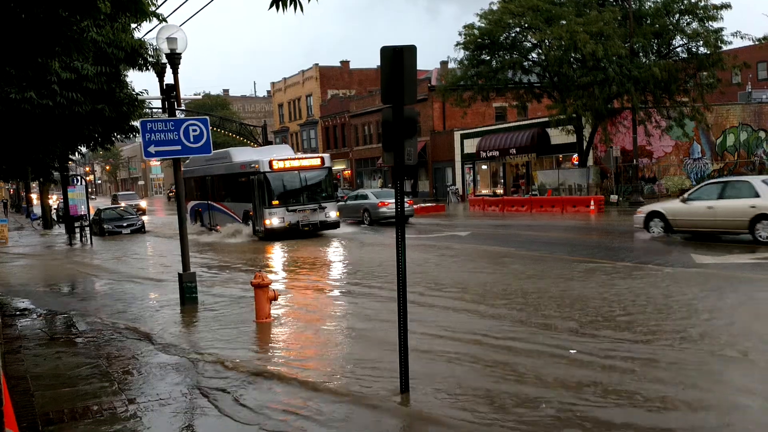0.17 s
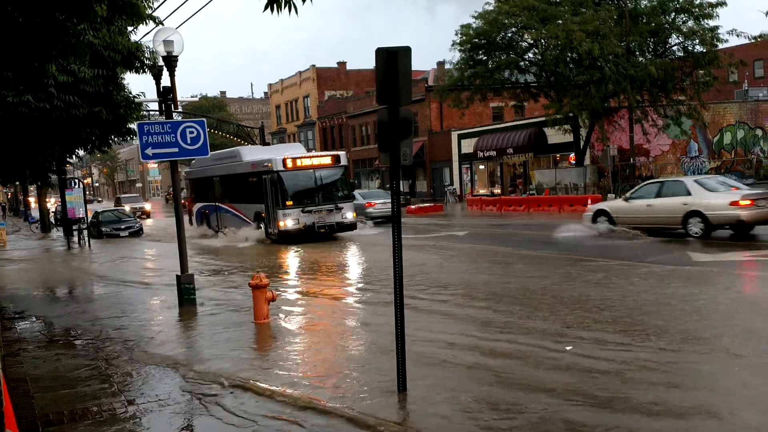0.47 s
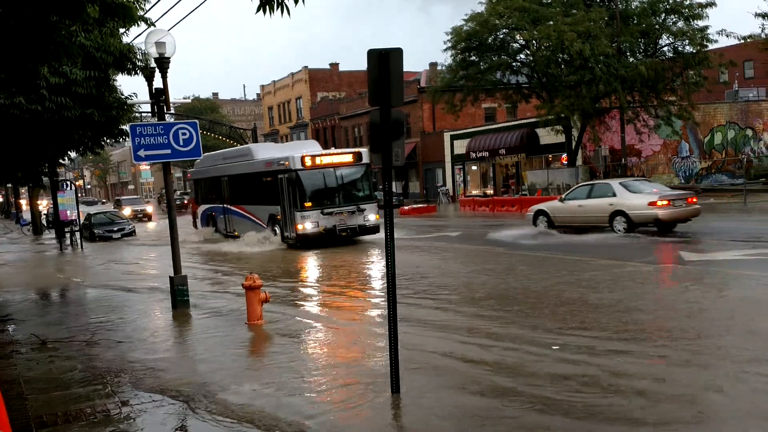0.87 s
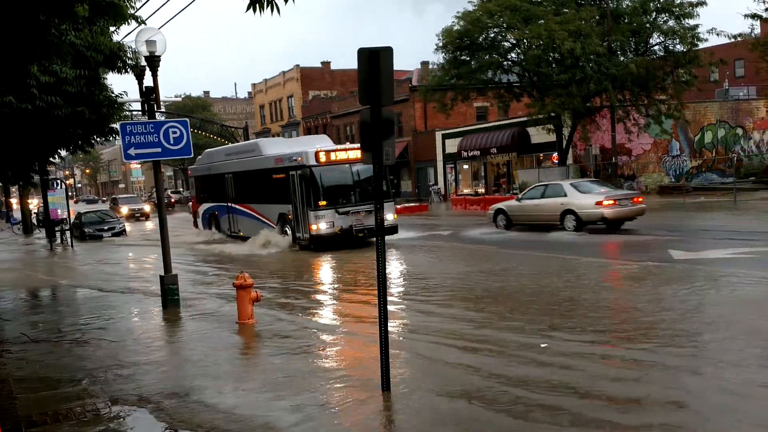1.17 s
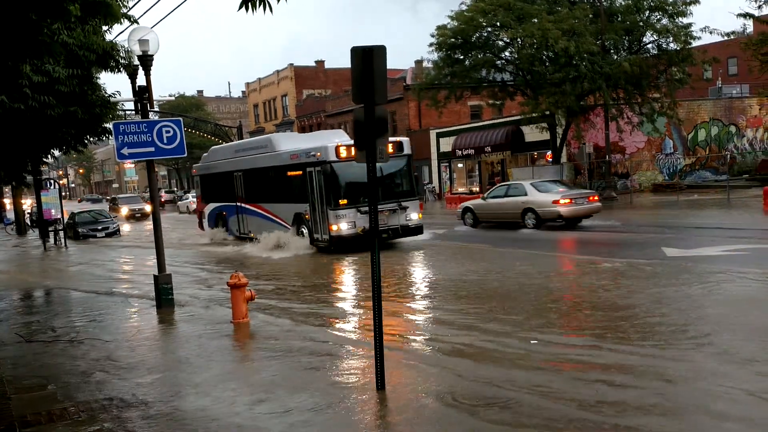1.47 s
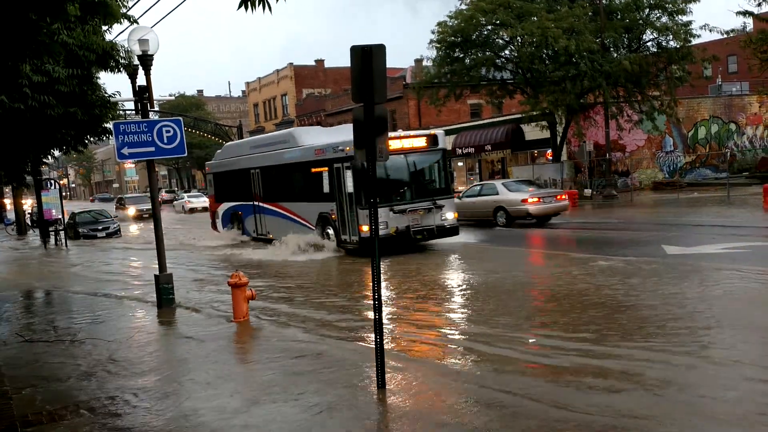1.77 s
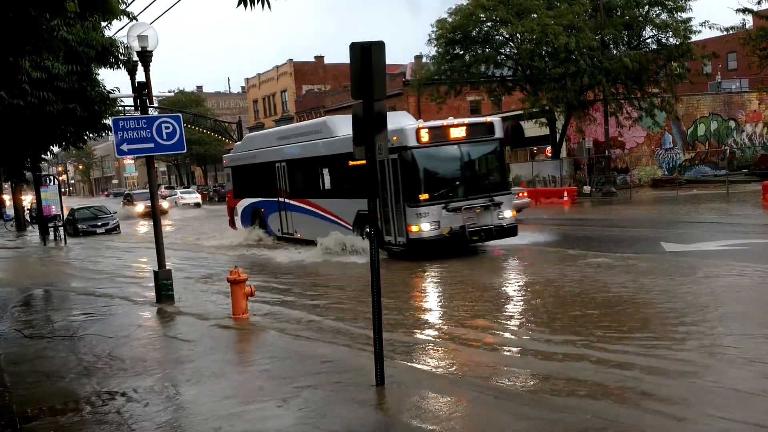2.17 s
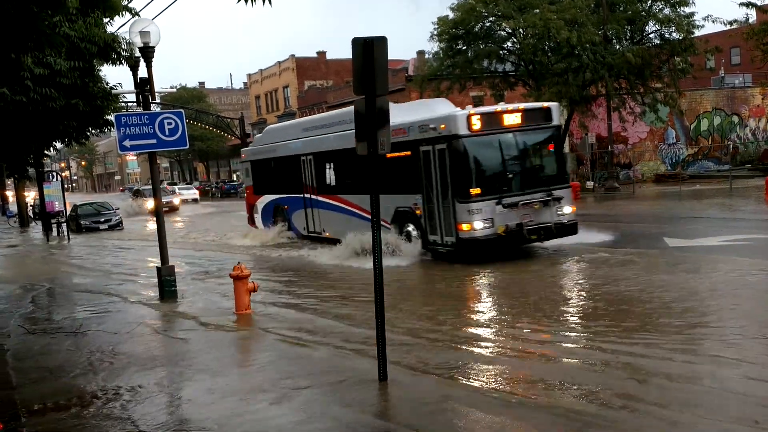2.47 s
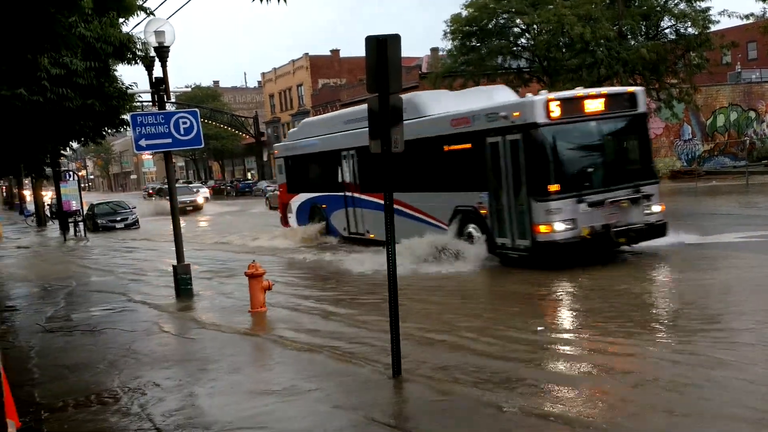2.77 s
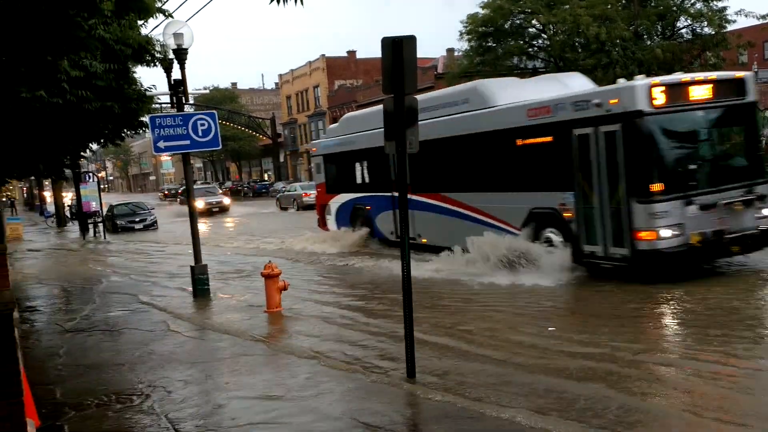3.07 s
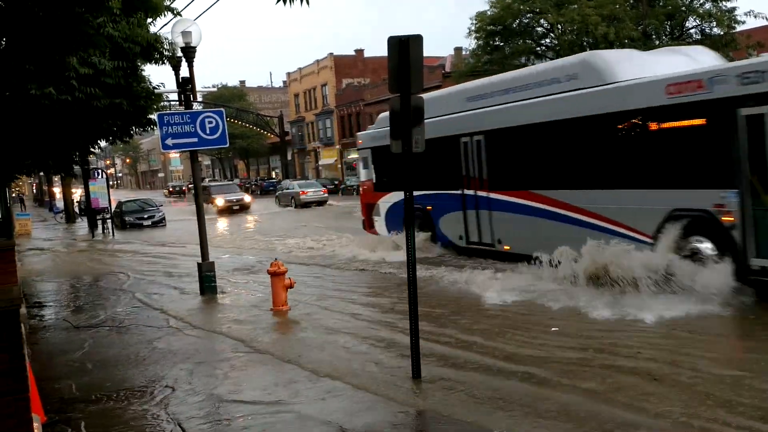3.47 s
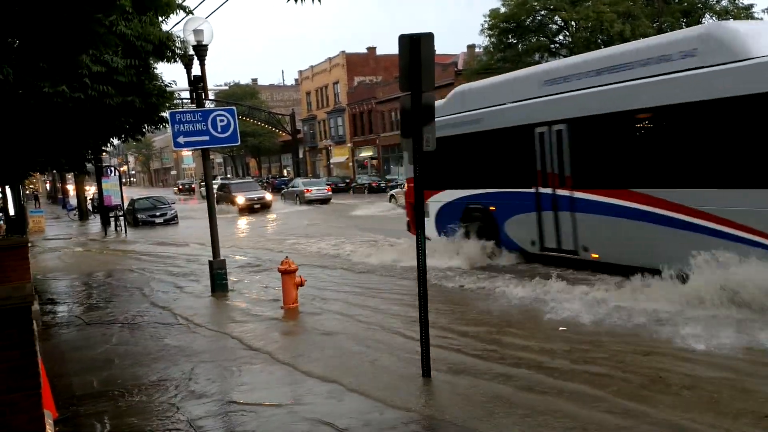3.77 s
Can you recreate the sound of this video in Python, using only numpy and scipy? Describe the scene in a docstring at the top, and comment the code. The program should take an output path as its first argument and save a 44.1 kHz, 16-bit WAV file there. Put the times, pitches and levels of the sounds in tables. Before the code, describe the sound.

A bus ploughs through a flooded street, a dense rush of churned water, rain and engine rumble. As it nears, hissing spray rises on the right, while wind buffets the left side of a hand-held phone microphone.

```python
"""A bus ploughs through a flooded street in the rain, heard by a hand-held phone with two microphone ports.
The sound fades in on a dense rush of engine rumble, bow wave, churned water, rain and spray.
From the outset wind buffets the left port only, with single puffs from 0.2 s to 3.4 s.
As the bus draws near, the rumble grows a little and the spray rises on the right, strongest after 3 s.
Throughout, the phone widens the stereo by subtracting from each side a late copy of the other."""
import sys
import numpy as np
from scipy import signal
from scipy.fft import rfft, irfft
from scipy.io import wavfile
from scipy.ndimage import uniform_filter1d

SR = 44100
rng = np.random.default_rng(int(sys.argv[2]) if len(sys.argv) > 2 else 0)


def master(y):
    """Save y as 16-bit WAV."""
    cut = np.clip(np.atleast_2d(y).T, -1, 1)
    pcm = np.round(cut * 32767)  # scale
    wavfile.write(sys.argv[1], SR, pcm.astype(np.int16))


N = 172431

# Spectrum of the engine rumble: frequency_hz, relative_density_db
ENGINE_SPECTRUM = [(30, -21), (60, -2.5), (100, -4), (140, -2), (185, 2), (260, -5.5), (370, -4.5),
                   (450, -15), (600, -44)]
# Engine rumble as the bus draws near: time_s, level_db
ENGINE_LEVELS = [(.45, -30.5), (.8, -30), (1, -28.5), (1.55, -30.5), (2.1, -28), (2.3, -30), (2.45, -26.5),
                 (2.7, -29), (3.0, -26.5), (3.2, -27), (3.6, -29.5), (3.9, -28.5)]
# Spectrum of the bow wave's hollow drone: frequency_hz, relative_density_db
BOW_WAVE_SPECTRUM = [(560, -3.5), (640, 0.5), (700, 1.5), (745, 1), (790, 0.5), (840, -2.5), (880, 0),
                     (960, -2)]
# Sloshing surges of the bow wave: time_s, level_db
BOW_WAVE_LEVELS = [(.45, -38.5), (.75, -37.5), (.95, -41), (1.07, -34.5), (1.17, -33.5), (1.25, -39),
                   (1.4, -35.5), (1.55, -40), (1.68, -37), (1.9, -37.5), (2.1, -35), (2.27, -39),
                   (2.47, -34), (2.65, -36), (2.77, -31), (2.85, -36.5), (2.92, -34), (3.02, -38.5),
                   (3.12, -32.5), (3.31, -37.5), (3.41, -35.5), (3.55, -35.5), (3.72, -40.5), (3.9, -32)]
# Spectrum of the churned water: frequency_hz, relative_density_db
CHURN_SPECTRUM = [(350, -7), (480, 4), (700, -3.5), (860, -1.5), (1050, 1.5), (1350, 3), (1700, -0.5),
                  (2200, 1)]
# Strength of the churned water and the rain: time_s, churn_db, rain_db
WATER_LEVELS = [(.35, -32.5, -27), (.5, -32, -27), (.6, -34, -28), (.81, -31, -25.5), (.9, -31.5, -27.5),
                (1.02, -31.5, -27), (1.1, -31, -27), (1.18, -31.5, -27.5), (1.3, -31.5, -28.5),
                (1.4, -30, -25.5), (1.43, -32, -29), (1.49, -30.5, -26.5), (1.54, -34, -30),
                (1.76, -31, -27.5), (1.83, -33.5, -30), (1.88, -31.5, -27.5), (2.17, -31, -26.5),
                (2.26, -34.5, -30), (2.43, -31, -26.5), (2.6, -32.5, -28), (2.79, -30, -26.5),
                (2.84, -32, -27), (3.03, -32.5, -29), (3.17, -33, -29), (3.26, -34.5, -29),
                (3.45, -32.5, -29.5), (3.58, -34, -28.5), (3.64, -36, -30), (3.72, -32, -28),
                (3.91, -35.5, -28.5)]
# Spectrum of the rain: frequency_hz, relative_density_db
RAIN_SPECTRUM = [(1500, -63), (2000, -10), (2600, -4), (3500, -10.5), (4200, -9), (5200, -9), (6800, -11),
                 (8500, -15), (10500, -18), (12500, -19.5), (15800, -13)]
# Spectrum of the wheel spray: frequency_hz, relative_density_db
SPRAY_SPECTRUM = [(6800, -12.5), (7700, -10.5), (8500, -1), (9300, -1.5), (10300, -4.5), (11800, -13),
                  (15000, -20)]
# Wheel spray relative to the rain: time_s, excess_db
SPRAY_OVER_RAIN = [(.3, -3.5), (.48, -1), (.65, -1), (.78, -2), (1.07, -1), (1.4, -1.5), (1.78, 0),
                   (2.1, -0.5), (2.45, 0.5), (2.75, 1.5), (3.03, 2.5), (3.17, 5), (3.27, 3.5), (3.57, 5),
                   (3.63, 4), (3.72, 5), (3.9, 4)]
# Spectrum of the wind buffeting: frequency_hz, relative_density_db
WIND_SPECTRUM = [(25, -14), (40, -5), (58, 0), (80, 0), (110, -2), (150, -6), (200, -12), (320, -21),
                 (600, -32)]
# Gusts at the left port: time_s, level_db
GUST_LEVELS = [(.12, -21), (.23, -23), (.35, -27), (.5, -30), (.6, -27), (.68, -30), (.77, -36), (.8, -25),
               (1.1, -26), (1.28, -30), (1.45, -28), (1.7, -27), (1.95, -32), (2.1, -30), (2.2, -40),
               (2.3, -40), (2.42, -25), (2.6, -28), (2.75, -29), (3, -24), (3.2, -26), (3.35, -34),
               (3.55, -33), (3.7, -41), (3.9, -40)]
# Single puffs of wind: peak_s, thump_db, pitch_hz
WIND_PUFFS = [(0.185, -9, 119), (0.204, -10, 130), (0.229, -10, 110), (0.244, -9, 124), (0.301, -11, 96),
              (0.313, -14, 100), (0.353, -17, 114), (0.557, -16, 94), (0.578, -16, 139), (0.604, -16, 89),
              (0.646, -11, 155), (0.797, -11, 150), (0.815, -11, 96), (0.844, -17, 111), (0.871, -13, 94),
              (0.91, -14, 114), (0.93, -17, 102), (1.012, -18, 191), (1.03, -14, 103), (1.08, -14, 144),
              (1.131, -18, 129), (1.153, -16, 114), (1.179, -16, 102), (1.445, -17, 122), (1.496, -21, 128),
              (1.525, -17, 98), (1.615, -17, 134), (1.667, -21, 120), (1.708, -19, 86), (1.74, -20, 83),
              (1.759, -21, 111), (1.924, -19, 106), (2.052, -13, 86), (2.102, -17, 120), (2.383, -17, 117),
              (2.445, -14, 143), (2.532, -10, 122), (2.551, -11, 110), (2.581, -19, 100), (2.611, -16, 101),
              (2.683, -11, 102), (2.785, -11, 126), (2.813, -20, 111), (2.833, -19, 101), (2.859, -15, 114),
              (2.947, -18, 102), (2.98, -12, 115), (3.041, -8, 139), (3.061, -9, 128), (3.1, -14, 91),
              (3.128, -15, 125), (3.154, -14, 117), (3.183, -18, 111), (3.224, -19, 137), (3.386, -11, 135)]
# Response of the left port relative to the right: frequency_hz, gain_db
LEFT_PORT_RESPONSE = [(200, 0), (300, -3), (420, 0), (1500, 0), (2000, -2), (2700, -4), (3800, -1.5),
                      (5200, -2.5), (7000, -.6), (12000, 2), (15800, 4)]
# Coherence between the two ports: frequency_hz, correlation_ratio
PORT_COHERENCE = [(60, 0.97), (200, 0.95), (370, 0.95), (460, 0.49), (600, 0.93), (800, 0.54), (1050, 0),
                  (1500, 0.09)]
# Share of the opposite side that the phone subtracts: frequency_hz, gain_ratio
CROSSFEED_GAINS = [(60, .85), (400, .86), (1000, .9), (2200, .92), (3200, .86), (4300, .8), (6500, .64),
                   (8400, .36), (10700, .1), (13000, .01)]

TIME_S = np.arange(N) / SR
BIN_HZ = np.arange(N // 2 + 1) * SR / N


def undb(db):
    """Amplitude ratio of a level in decibels."""
    return 10 ** (np.asarray(db) / 20)


def over_hz(table):
    """Interpolation of a table at every spectral bin, on a logarithmic frequency axis."""
    hz, values = np.array(table, float).T
    return np.interp(np.log(BIN_HZ + 1), np.log(hz), values)


def over_s(table, column=1):
    """Linear interpolation of one column of a time table at every sample."""
    rows = np.array(table, float)
    return np.interp(TIME_S, rows[:, 0], rows[:, column])


def wander(rate_hz):
    """Slow random modulation: Gaussian steps smoothed by two moving averages."""
    hold = int(SR / rate_hz)
    steps = np.repeat(rng.standard_normal(N // hold + 1), hold)
    return 0.99 * uniform_filter1d(uniform_filter1d(steps, hold), hold)[:N]


def shot_spectrum(clicks_per_s, scatter_db, click_share):
    """Spectrum of shot noise plus hiss: independent signals add in power, here in a set proportion."""
    chance, polarity, size = rng.random((3, N))
    clicks = (chance < clicks_per_s / SR) * np.sign(polarity - .5)
    clicks *= undb(-scatter_db * np.log(size + .01))
    hiss = rng.standard_normal(N)
    return rfft(np.sqrt(click_share) * clicks / clicks.std() + np.sqrt(1 - click_share) * hiss)


def rush(spectrum, clicks_per_s, scatter_db, click_share, flicker_db, flicker_hz):
    """Partly coherent noise at two ports, modulated in half-octave bands; unit rms on the right."""
    coherence = over_hz(PORT_COHERENCE)
    common, left, right = (shot_spectrum(clicks_per_s, scatter_db, click_share) for _ in range(3))
    ports = np.sqrt(coherence) * common + np.sqrt(1 - coherence) * np.array([left, right])
    ports *= undb(over_hz(spectrum))
    ports[0] *= undb(over_hz(LEFT_PORT_RESPONSE))
    low_hz, high_hz = spectrum[0][0], spectrum[-1][0]
    half_octaves = 2 * np.log2((BIN_HZ + 1) / low_hz)
    out = 0
    for band in range(int(2 * np.log2(high_hz / low_hz)) + 1):
        window = np.cos(np.clip(half_octaves - band, -1, 1) * np.pi / 2) ** 2
        out += irfft(ports * window, N) * undb(flicker_db * wander(flicker_hz))
    return out / out[1].std()


def engine():
    """Low-frequency noise of the engine, rising unevenly in level as the source approaches."""
    rumble = rush(ENGINE_SPECTRUM, clicks_per_s=300, scatter_db=2, click_share=.13,
                  flicker_db=.87, flicker_hz=21.07)
    return rumble * undb(over_s(ENGINE_LEVELS))


def bow_wave():
    """Narrow-band noise heard as a hollow drone; sloshing modulates it and its gurgles together."""
    drone = rush(BOW_WAVE_SPECTRUM, clicks_per_s=60, scatter_db=2.1, click_share=.17,
                 flicker_db=.67, flicker_hz=6.4)
    return (drone + undb(-10) * gurgles()) * undb(over_s(BOW_WAVE_LEVELS))


def gurgles(pockets_per_s=40, low_hz=581.2, high_hz=880, length_s=.09):
    """Resonance of trapped air: each pocket sings briefly on one slightly gliding pitch; unit rms."""
    out, t = np.zeros(N), np.arange(int(length_s * SR)) / SR
    envelope = np.sin(np.pi * t / length_s) ** 2
    for onset, pitch, bend, size in rng.random((int(pockets_per_s * N / SR), 4)):
        start_hz = low_hz * (high_hz / low_hz) ** pitch
        glide = 1 + .032 * (2 * bend - 1) * t / length_s
        start = int(onset * (N - len(t)))
        out[start:start + len(t)] += size ** 1.57 * envelope * np.sin(2 * np.pi * start_hz * glide * t)
    return out / out.std()


def churned_water():
    """Random splashes of churned water superpose into a grainy mid-frequency noise."""
    churn = rush(CHURN_SPECTRUM, clicks_per_s=800, scatter_db=1.96, click_share=.32,
                 flicker_db=.98, flicker_hz=14)
    return churn * undb(over_s(WATER_LEVELS, column=1))


def rain():
    """Shot noise of rain: thousands of independent impacts a second merge into a hiss."""
    hiss = rush(RAIN_SPECTRUM, clicks_per_s=4000, scatter_db=2.5, click_share=.25,
                flicker_db=.5, flicker_hz=16)
    return hiss * undb(over_s(WATER_LEVELS, column=2))


def wheel_spray(left_db=-9):
    """High-frequency shot noise of spray, placed on the right by a level difference between the ports."""
    spray = rush(SPRAY_SPECTRUM, clicks_per_s=6000, scatter_db=2.2, click_share=.2,
                 flicker_db=.45, flicker_hz=18)
    level_db = over_s(WATER_LEVELS, column=2) + over_s(SPRAY_OVER_RAIN)
    return spray * undb([[left_db], [0]]) * undb(level_db)


def wind_buffeting():
    """Turbulent pressure at the port: lumpy low-frequency noise that follows the gusts."""
    buffet = irfft(rfft(rng.standard_normal(N)) * undb(over_hz(WIND_SPECTRUM)), N)
    buffet *= undb(2.5 * wander(rate_hz=40))
    return buffet / buffet.std() * undb(over_s(GUST_LEVELS))


def wind_puffs(rise_s=.003, fall_s=.010, slap_s=.0019, slap_hz=260):
    """Pressure pulses thump the membrane for a cycle or two, with a slap that grows quadratically."""
    out, lead = np.zeros(N), 1000
    t = np.arange(-lead, 3000) / SR
    envelope = np.exp(-np.where(t < 0, (t / rise_s) ** 2, (abs(t) / fall_s) ** 1.9))
    slap = undb(1) * np.exp(-(t / slap_s) ** 2) * np.cos(2 * np.pi * slap_hz * t)
    for peak_s, thump_db, pitch_hz in WIND_PUFFS:
        thump = envelope * np.cos(2 * np.pi * (pitch_hz * t + rng.random()))
        gain = undb(thump_db)
        start = int(peak_s * SR) - lead
        out[start:start + len(t)] += gain * thump + gain ** 2 * slap
    return out


def scene():
    """Superposition: the gently wavering street sound at both ports, the wind at the left one."""
    swell = undb(.5 * wander(rate_hz=9.76))
    ports = swell * (engine() + bow_wave() + churned_water() + rain() + wheel_spray())
    ports[0] += wind_buffeting() + wind_puffs()
    return ports


def record(dry):
    """Interference with a delayed, inverted crossfeed widens the stereo; band limits and fade-in follow."""
    lag_s = .0004595 + .00004 * (BIN_HZ / 22600) ** 2  # slightly longer in the treble
    crossfeed = over_hz(CROSSFEED_GAINS) * np.exp(-2j * np.pi * BIN_HZ * lag_s)
    wide = dry - irfft(rfft(dry[::-1]) * crossfeed, N)
    low_cut_hz, top_cut_hz = 44, 15760
    high_pass = signal.butter(4, low_cut_hz, "high", fs=SR, output="sos")
    low_pass = signal.ellip(12, .2, 80, top_cut_hz, fs=SR, output="sos")
    silent_until_s, ramp_s = .114, (.081, .38)
    fade = (TIME_S > silent_until_s) * np.interp(TIME_S, ramp_s, (0, 1))
    return signal.sosfilt(low_pass, signal.sosfilt(high_pass, wide) * fade)


dry = scene()
out = record(dry)
master(out)
```